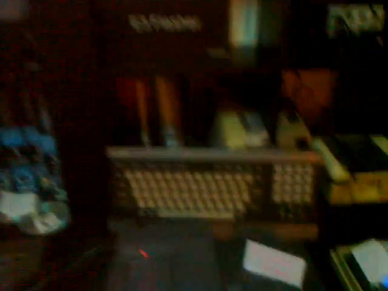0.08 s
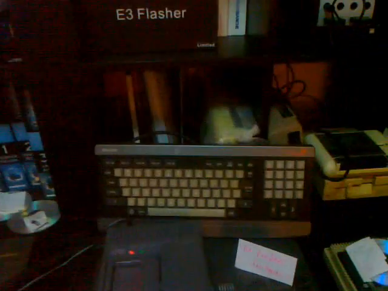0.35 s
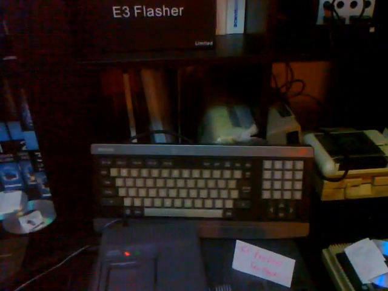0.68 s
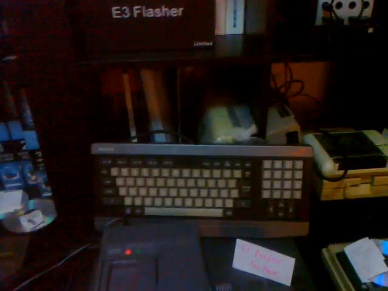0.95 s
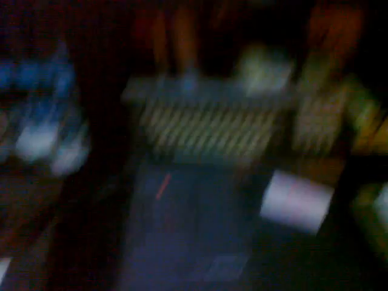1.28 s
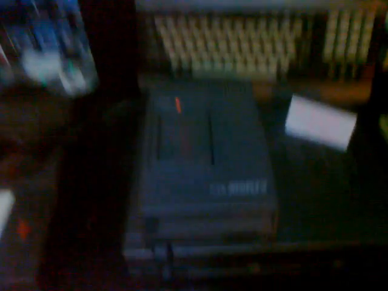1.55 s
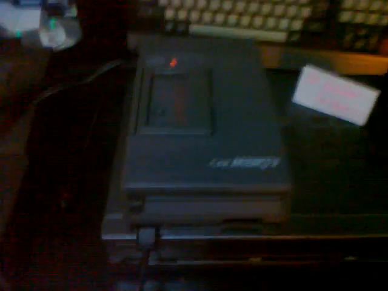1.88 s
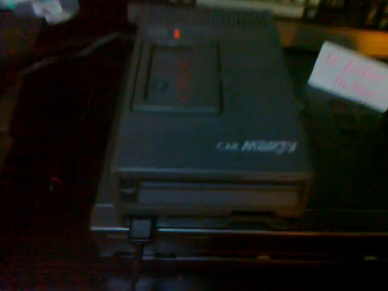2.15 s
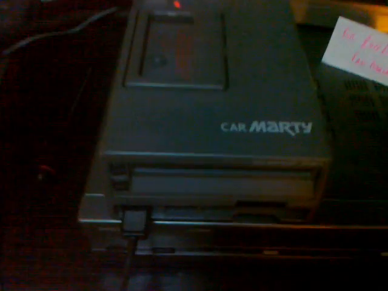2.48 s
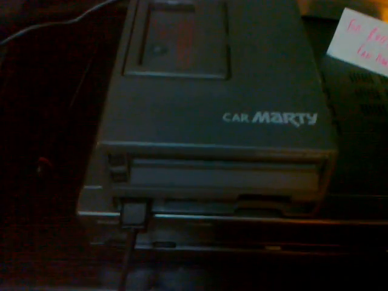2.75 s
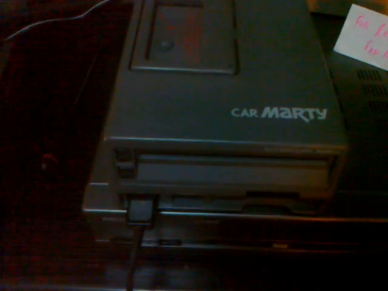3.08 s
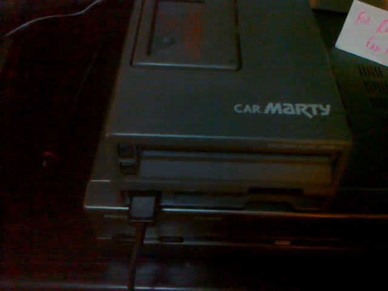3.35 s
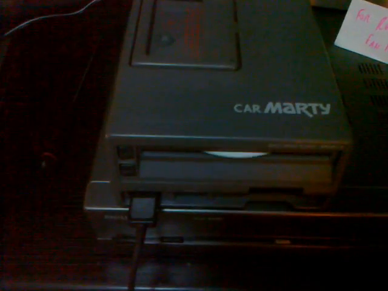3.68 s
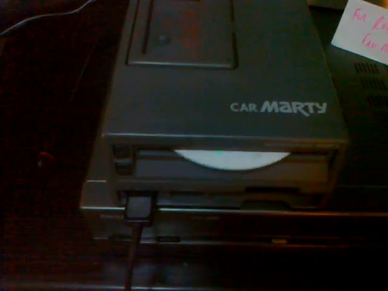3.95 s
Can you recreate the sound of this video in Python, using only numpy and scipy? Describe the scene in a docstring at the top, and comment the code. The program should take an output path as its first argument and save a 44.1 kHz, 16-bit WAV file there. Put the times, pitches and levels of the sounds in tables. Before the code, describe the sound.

A disc drive pushes out a disc, its little motor whirring amid plastic clicks and knocks.

```python
"""A quiet room, a hand-held microphone close to a small disc drive ejecting its disc.
The mechanism engages with a clack; a little motor whirs through plastic gears, slowing under load.
Sliding levers squeal, the clamp lets go with a loud clunk, levers knock, the disc is pushed out.
Underneath: hiss, faint mains hum, and the hand rumbling and bumping on the microphone."""
import sys
import numpy as np
from scipy import signal
from scipy.fft import rfft, irfft
from scipy.io import wavfile

SR = 44100
rng = np.random.default_rng(int(sys.argv[2]) if len(sys.argv) > 2 else 0)


def wrap_up_sound(samples):
    """Save the sound to the file named by the first command line argument, as 16-bit audio."""
    columns = np.atleast_2d(samples).T
    # keep every value between -1 and 1, then stretch to whole-number steps
    tamed = np.clip(columns, -1, 1)
    steps = np.round(tamed * 32767).astype(np.int16)
    wavfile.write(sys.argv[1], SR, steps)


N = 176400
T = np.arange(N) / SR
TAIL_S = T[:SR // 2]

# Hiss spectrum. Each row: frequency in Hz, gain in dB.
HISS_COLOUR = [(88, -39), (150, 0), (366, -2.5), (404, -2.5), (1000, -12.5), (2060, -15), (4480, -16.5),
               (5330, -14.5), (5760, -16), (15500, -19)]
# Mains hum, rising as the microphone nears the drive. Each row: time in seconds, level in dB.
HUM_LEVEL = [(2.5, -94), (3.1, -63), (4.0, -66)]
# Faint whine before the start. Each row: frequency in Hz, level in dB.
WHINE_TONES = [(3620, -79), (5432, -72.5)]
# Spectra of hand rumble, finger brush and handling ticks. Each row: frequency in Hz, gain in dB.
RUMBLE_COLOUR = [(15, -5.5), (35, 3.5), (65, -2), (120, -6), (250, -18.5), (600, -36), (2000, -82)]
BRUSH_COLOUR = [(300, -3), (1000, -2), (2500, -2.5), (5000, -8), (12000, -22)]
TICK_COLOUR = [(400, -8), (1000, -5), (1600, -1), (2600, -7.5), (4500, -16), (12000, -30)]
# Hand bumps. Each row: centre in seconds, level in dB, frequency in Hz, half-width in seconds.
HAND_BUMPS = [(0.136, -51, 53.6, 0.015), (0.5194, -43.5, 332, 0.0011), (0.542, -43.5, 50.6, 0.014),
              (2.021, -58.5, 66.4, 0.065)]
# Handling ticks. Each row: start in seconds, level in dB.
HAND_TICKS = [(.572, -57), (.588, -72), (.962, -60.5)]
# Lever squeals. Each row: start and end in seconds, first and last pitch in Hz, level in dB.
LEVER_SQUEALS = [(2.619, 2.699, 2330, 2240, -55.5), (2.687, 2.758, 2080, 1860, -48),
                 (2.838, 2.91, 1800, 1794, -48.5)]
# Motor shaft. Each row: time in seconds, speed in turns per second.
SHAFT_SPEED = [(2.52, 92), (2.61, 96.7), (2.69, 94.7), (2.73, 98.8), (2.82, 100.2), (2.95, 100),
               (3.01, 95.5), (3.08, 99.8), (3.14, 100), (3.19, 95.6), (3.24, 96.2), (3.28, 98.5),
               (3.32, 104.3), (3.40, 103.6), (3.44, 98.5), (3.50, 99.5), (3.54, 94.7), (3.58, 93),
               (3.63, 88.8), (3.74, 86.6), (3.88, 89.5), (3.94, 84.6), (4.0, 84.2)]
# Rotor hum. Each row: multiple of shaft speed, level in dB unclamping, level in dB pushing the disc.
ROTOR_TONES = [(2.993, -64.5, -61.5), (4.55, -64, -56), (9, -55, -65), (9.93, -58.5, -86), (12, -67, -67),
               (15, -73, -56.5), (21, -76, -54.5), (24, -81, -56.5), (27, -74, -60.5), (30.6, -89, -73),
               (36, -75, -71)]
# Pinion tooth whine. Each row: time in seconds, level in dB.
MESH_LEVEL = [(2.53, -55), (2.60, -45), (2.65, -44.5), (2.75, -59), (3.10, -65), (3.17, -39), (3.21, -51),
              (3.27, -40), (3.31, -45), (3.41, -50.5), (3.45, -42.5), (3.51, -39.5), (3.54, -48.5),
              (3.58, -42.5), (3.63, -62.5), (4.0, -59)]
# Tooth buzz under load. Each row: start and end in seconds, level in dB.
LOAD_BUZZES = [(2.56, 2.7, -53.5), (3.174, 3.296, -53), (3.916, 4.056, -50.5)]
# Partials of tooth whine and buzz. Each row: multiple of shaft speed, gain in dB.
MESH_TONES = [(12, 2), (12.4, -17), (13, -12.5), (11, -31)]
BUZZ_TONES = [(15, 3.5), (17, -6), (20, -10), (21, -11), (24, -23), (27, -13), (36, -11.5), (42, -22),
              (48, -16.5), (51, -25)]
# Gear rattle, overall and extra on its treble. Each row: time in seconds, gain in dB.
RATTLE_LEVEL = [(2.53, -43), (2.62, -48.5), (2.72, -44.5), (2.79, -50.5), (2.87, -47), (2.99, -48.5),
                (3.10, -46.5), (3.22, -49.5), (3.35, -47), (3.44, -45), (3.53, -46.5), (3.62, -48.5),
                (3.78, -50.5), (3.92, -49), (4.0, -48)]
RATTLE_TREBLE = [(2.53, 7.5), (2.66, -0.5), (2.75, -5.5), (3.0, -2.5), (3.2, 2.5), (3.38, 3.5), (3.6, 1),
                 (4.0, 2)]
# Spectra of gear rattle, small-part clatter and contact snap. Each row: frequency in Hz, gain in dB.
RATTLE_COLOUR = [(60, -17.5), (150, -21.5), (230, -9.5), (330, -14), (440, 0), (560, -6), (680, -5),
                 (900, -8), (1050, -4.5), (1300, -2.5), (1900, -4.5), (2450, -10.5), (2900, -18),
                 (3600, -21.5), (4600, -21.5), (6200, -23.5), (7500, -33), (15000, -39.5)]
CLATTER_COLOUR = [(50, -14), (160, -12.5), (250, -9.5), (450, 9), (650, -3.5), (1100, 1), (2000, -2),
                  (3000, -21.5), (4500, -25), (6200, -20.5), (8000, -56), (15000, -49)]
SNAP_COLOUR = [(500, -31), (2500, 16.5), (5500, 2), (7200, -5.5), (9000, -1.5), (12000, -9.5), (15500, -13)]
# Modes of gearbox and plastic case. Each row: frequency in Hz, gain in dB, T60 in seconds.
GEARBOX_MODES = [(397.4, -2, 0.23), (454, -6.5, 0.097), (478, -3.5, 0.097), (768.3, 0, 0.16),
                 (901, -0.5, 0.22), (947, -3.5, .11), (1187, 1.5, 0.15), (1259, -2, 0.13), (1335, -9, 0.14),
                 (1561, -3, 0.076), (1782, -0.5, 0.16), (1883, -2.5, 0.058), (2055, -13, 0.069),
                 (2410, -9, .06)]
CASE_MODES = [(402, -17.5, 0.17), (517, -32, 0.072), (735, -16.5, 0.12), (926, -15.5, 0.087),
              (1208, -23, .12), (1315, -16, .08), (1515, -19, 0.1), (1794, 0, 0.067), (2340, -8, 0.036),
              (2507, -6.5, 0.028), (3100, -15.5, 0.056), (3660, -16, 0.045)]
# Latch, clamp and lever knocks. Each row: start in seconds, levels of clatter, case ring, snap
# and thud in dB, thud pitch in Hz.
KNOCKS = [(2.524, -33, -38, -70, -35, 810), (2.528, -34, -46, -39.5, -51, 500),
          (2.539, -31.5, -39, -52, -24.5, 742), (2.546, -50, -51, -52, -28.5, 449),
          (2.555, -40, -39.5, -59, -29, 517), (2.577, -49, -55, -67, -35, 460),
          (2.854, -43.5, -43, -70, -32.5, 488), (2.882, -47, -64, -71, -36, 486),
          (2.930, -39.5, -39, -48, -34.5, 433.4), (2.945, -37.5, -45, -60, -39, 403),
          (3.018, -33, -53, -37.5, -55, 406), (3.0258, -27, -26, -29, -46, 420),
          (3.031, -27, -22.5, -55, -31, 422), (3.035, -22.5, -15.5, -33, -23.5, 395),
          (3.042, -32, -42, -50, -42, 77), (3.061, -28.5, -51, -43, -37, 451),
          (3.078, -35, -37.5, -55, -55, 400), (3.129, -40, -55, -60, -31, 454),
          (3.163, -40, -60, -73, -42, 477), (3.281, -44, -47, -55, -46, 422),
          (3.408, -41, -44, -54, -47, 404), (3.427, -49, -54, -65, -36, 430),
          (3.464, -38, -66, -52, -41, 400), (3.470, -38, -34.5, -42.5, -29.5, 402),
          (3.487, -37, -35, -54, -32.5, 407), (3.975, -44.5, -40.5, -62, -63, 400)]


def from_db(db):
    """Decibels to gain."""
    return 10 ** (np.asarray(db) / 20)


def rms_one(x):
    """Scale to unit rms."""
    return x / np.sqrt(np.mean(x ** 2) + 1e-20)


def in_time(rows):
    """Join (seconds, value) points by straight lines."""
    return np.interp(T, *np.transpose(rows))


def swell(start_s, end_s):
    """Rounded arch, peak 1."""
    return np.sqrt(np.clip(1 - (2 * (T - start_s) / (end_s - start_s) - 1) ** 2, 0, 1))


def decay(t60_s):
    """Exponential fade, 60 dB per T60."""
    return from_db(-60 * TAIL_S / t60_s)


def drift(rate_hz):
    """Slow random wander, rms 1."""
    hop, settle = 40, 2000
    pole = np.exp(-2 * np.pi * hop * rate_hz / SR)
    noise = rng.standard_normal(N // hop + settle + 2)
    slow = signal.lfilter([1], [1, -2 * pole, pole * pole], noise)[settle:]
    return np.interp(np.arange(N) / hop, np.arange(len(slow)), rms_one(slow))


def coloured(x, colour):
    """Filter by a (Hz, dB) curve; rms 1."""
    hz, db = np.transpose(colour)
    bins_hz = np.maximum(np.arange(len(x) // 2 + 1) * SR / len(x), 1)
    gain = from_db(np.interp(np.log(bins_hz), np.log(hz), db))
    return rms_one(irfft(rfft(x) * gain, len(x)))


def burst(colour, t60_s, rise_s=0.00058, room_db=-10.5, room_t60_s=0.27):
    """Dense short resonances dying together, then the room's tail."""
    fade = np.hypot(decay(t60_s), from_db(room_db) * decay(room_t60_s))
    return coloured(rng.standard_normal(len(TAIL_S)), colour) * fade * (1 - np.exp(-TAIL_S / rise_s))


def ring(hz, t60_s):
    """One struck mode."""
    return np.sin(2 * np.pi * hz * TAIL_S) * decay(t60_s)


def body_ring(modes):
    """One blow on a plastic body; mode strengths vary at random."""
    return sum(from_db(db + rng.normal(0, 1.0)) * ring(hz, t60_s) * (-1) ** k
               for k, (hz, db, t60_s) in enumerate(modes))


def tone(cycles, db, jitter_rad=0.29, waver_db=1.5):
    """Sine with trembling level and phase."""
    level = from_db(db + waver_db * drift(22))
    return np.sqrt(2) * level * np.sin(2 * np.pi * (cycles + rng.random()) + jitter_rad * drift(47))


def background(hiss_db=-66.5, mains_hz=50):
    """Steady hiss, mains hum and one brief whine."""
    whine = swell(1.972, 2.048) * sum(from_db(db) * np.sin(2 * np.pi * hz * T) for hz, db in WHINE_TONES)
    hum = from_db(in_time(HUM_LEVEL)) * np.sin(2 * np.pi * mains_hz * T)
    return whine + hum + from_db(hiss_db) * coloured(rng.standard_normal(N), HISS_COLOUR)


def handling(rumble_db=-66.5, brush_db=-74):
    """The hand rumbles, bumps, brushes and ticks on the microphone housing."""
    out = from_db(rumble_db) * coloured(rng.standard_normal(N), RUMBLE_COLOUR)
    for centre_s, db, hz, half_width_s in HAND_BUMPS:
        t = T - centre_s
        out += from_db(db) * np.exp(-(t / half_width_s) ** 2) * np.sin(2 * np.pi * hz * t)
    out += from_db(brush_db) * swell(1.89, 2.68) * coloured(rng.standard_normal(N), BRUSH_COLOUR)
    for start_s, db in HAND_TICKS:
        add(out, start_s, from_db(db) * burst(TICK_COLOUR, t60_s=0.068))
    return out


def add(out, start_s, sound):
    """Mix a sound in place."""
    i = int(start_s * SR)
    out[i:i + len(sound)] += sound[:max(N - i, 0)]


def lever_squeals():
    """Plastic sticks and slips as the levers slide; the pitch falls."""
    out = np.zeros(N)
    for start_s, end_s, first_hz, last_hz, db in LEVER_SQUEALS:
        cycles = np.cumsum(in_time([(start_s, first_hz), (end_s, last_hz)])) / SR
        out += swell(start_s, end_s) * tone(cycles, db, jitter_rad=0.31)
    return out


def motor(turns, push_from_s=3.48, push_full_s=3.536, mesh_waver_db=2.5):
    """Rotor hum, tooth whine and buzz under load, all locked to the shaft."""
    push = in_time([(push_from_s, 0), (push_full_s, 1)])
    hum = sum(tone(k * turns, unclamp_db + push * (push_db - unclamp_db))
              for k, unclamp_db, push_db in ROTOR_TONES)
    whine = sum(tone(k * turns, in_time(MESH_LEVEL) + db + mesh_waver_db * drift(19), jitter_rad=0.15)
                for k, db in MESH_TONES)
    load = sum(from_db(db) * swell(start_s, end_s) for start_s, end_s, db in LOAD_BUZZES)
    buzz = sum(tone(k * turns, db) for k, db in BUZZ_TONES)
    return hum + whine + load * buzz


def gears(turns, pinion_teeth=12, spread_db=2.5, loose_t60_s=0.079, ring_db=-3.5, treble_hz=3120):
    """Teeth tick unevenly into the gearbox; their rubbing partly repeats every turn."""
    contacts = np.diff(np.floor(turns * pinion_teeth), prepend=0)
    ticks = rms_one(contacts * rng.standard_normal(N) * from_db(spread_db * drift(61)))
    scatter = rng.standard_normal(len(TAIL_S)) * decay(loose_t60_s)
    loose = rms_one(signal.fftconvolve(ticks, scatter)[:N])
    surface = irfft(np.exp(2j * np.pi * rng.random(size=200)))  # roughness over one turn
    surface_turns = np.linspace(0, 1, len(surface), endpoint=False)
    repeating = rms_one(np.interp(turns, surface_turns, surface, period=1))
    rub = 0.27 * repeating * (1 + 0.35 * drift(20)) + 0.33 * ticks
    ringing = rms_one(signal.fftconvolve(ticks, body_ring(GEARBOX_MODES))[:N])
    rattle = coloured(0.65 * loose + rub, RATTLE_COLOUR) + from_db(ring_db) * ringing
    treble = signal.sosfiltfilt(signal.butter(2, treble_hz, "high", fs=SR, output="sos"), rattle)
    rattle += (from_db(in_time(RATTLE_TREBLE)) - 1) * treble
    return from_db(in_time(RATTLE_LEVEL)) * rattle


def knocks(thud_rise_s=0.0024):
    """Each knock shakes small parts, snaps, rings the case and thuds in the struck part."""
    out = np.zeros(N)
    for start_s, clatter_db, case_db, snap_db, thud_db, thud_hz in KNOCKS:
        clatter = from_db(clatter_db) * burst(CLATTER_COLOUR, t60_s=0.051)
        snap = from_db(snap_db) * burst(SNAP_COLOUR, t60_s=0.068)
        case = from_db(case_db) * body_ring(CASE_MODES)
        thud = from_db(thud_db) * ring(thud_hz, t60_s=0.093) * (1 - np.exp(-TAIL_S / thud_rise_s))
        add(out, start_s, clatter + snap + case + thud)
    return out


def scene():
    """One shaft drives motor tones and gears; squeals, knocks and surroundings join in mono."""
    start_s, spin_up_s, flutter = 2.524, 0.012, 0.004
    turns = np.cumsum(in_time(SHAFT_SPEED) * (1 + flutter * drift(30))) / SR
    fade_in = np.clip((T - start_s) / spin_up_s, 0, 1)
    whir = fade_in * (motor(turns) + gears(turns))
    return (whir + lever_squeals() + knocks() + handling() + background())[None]


def record(dry):
    """Steep low-pass."""
    cutoff_hz = 15700
    return signal.sosfilt(signal.ellip(12, .1, 70, cutoff_hz, fs=SR, output="sos"), dry)


dry = scene()
out = record(dry)
wrap_up_sound(out)
```